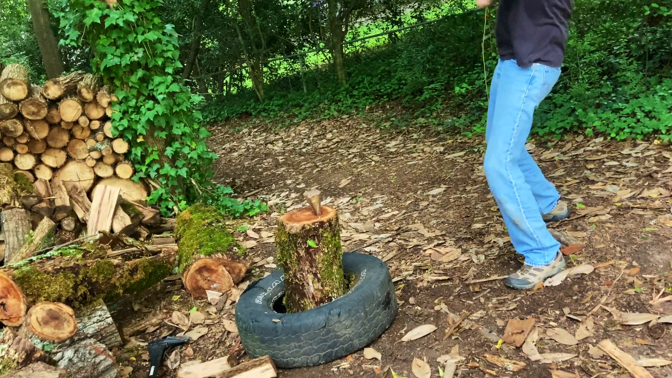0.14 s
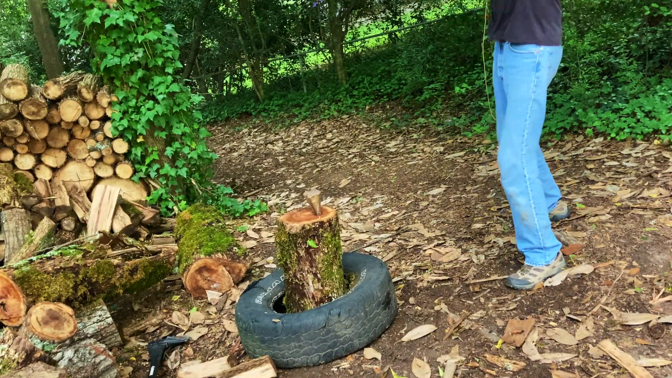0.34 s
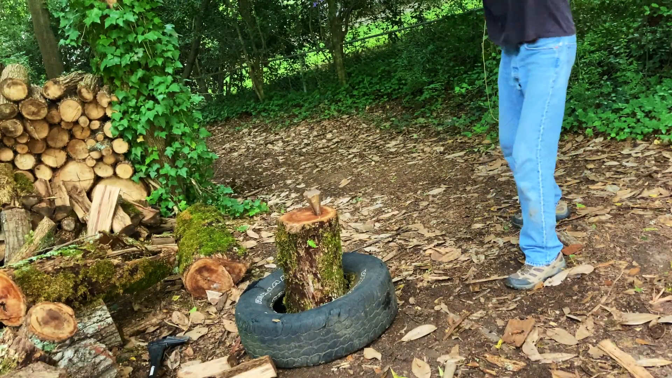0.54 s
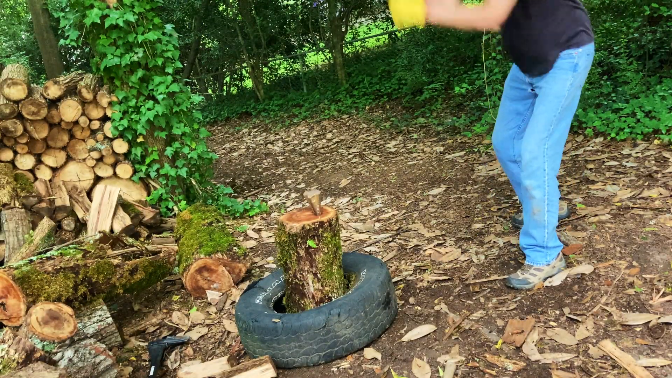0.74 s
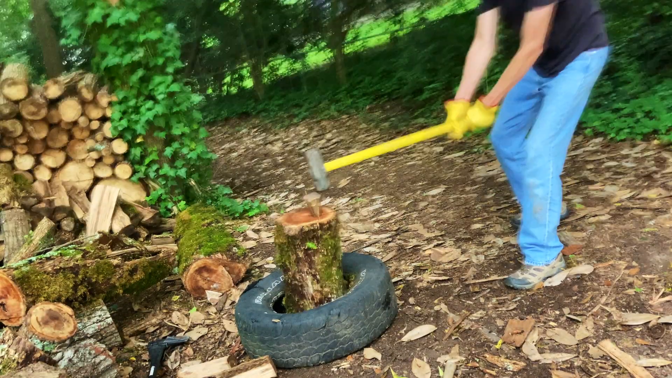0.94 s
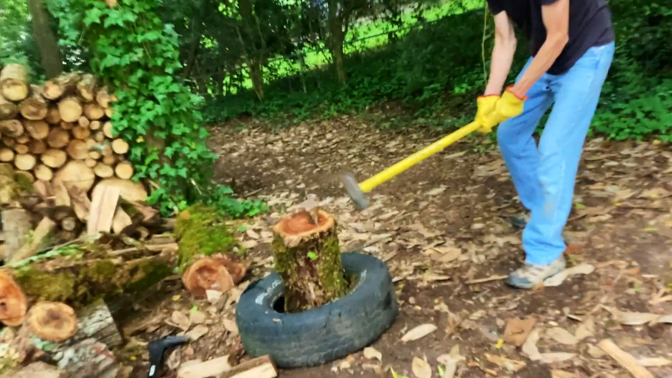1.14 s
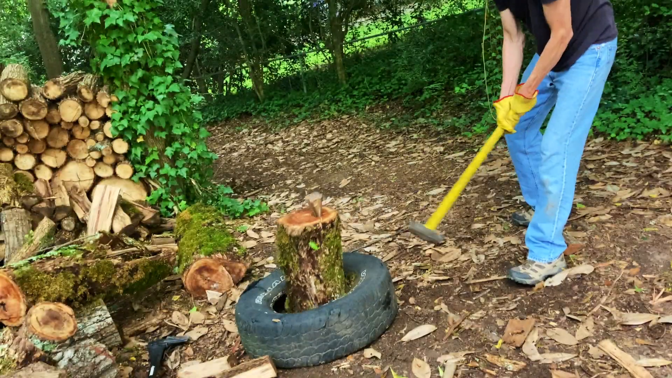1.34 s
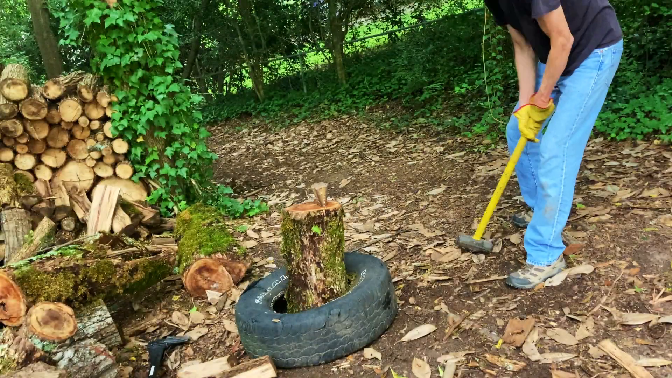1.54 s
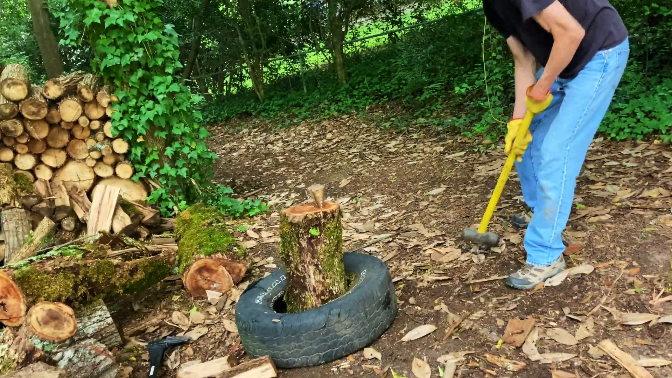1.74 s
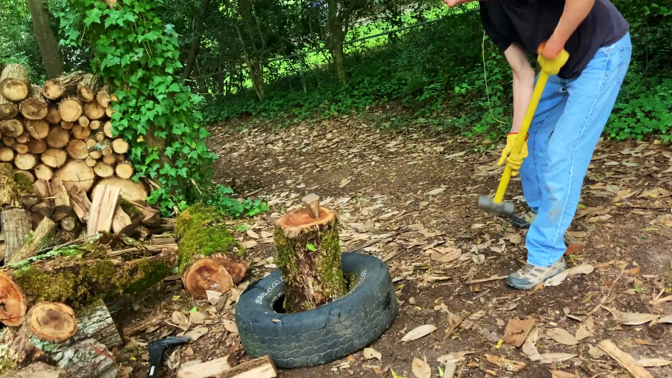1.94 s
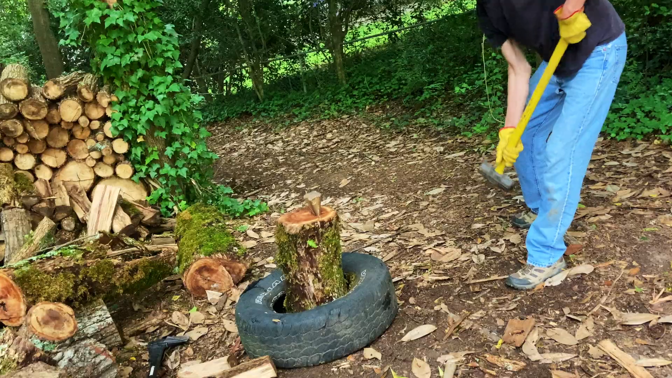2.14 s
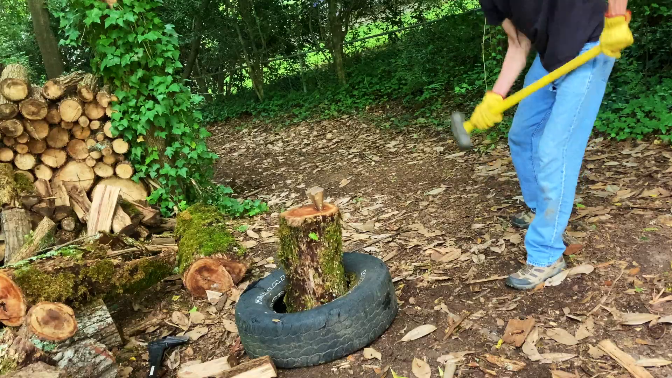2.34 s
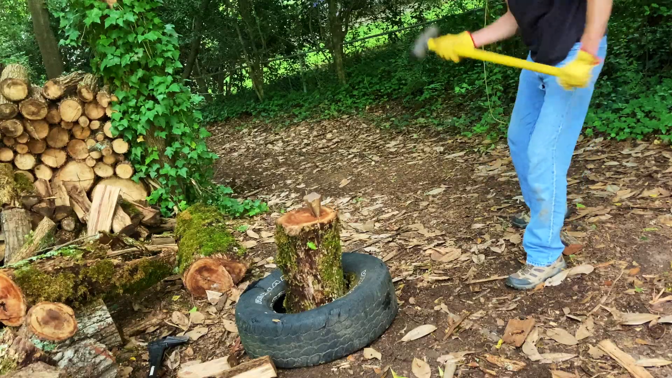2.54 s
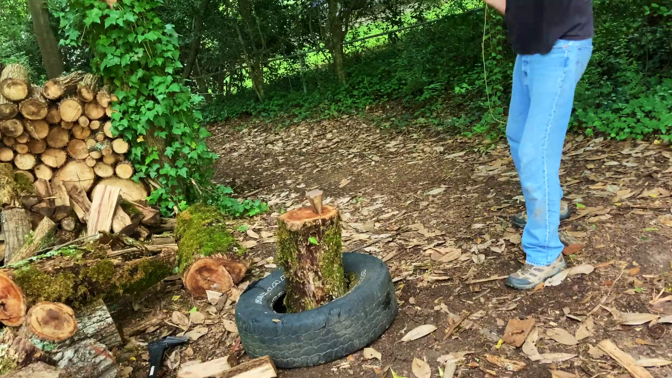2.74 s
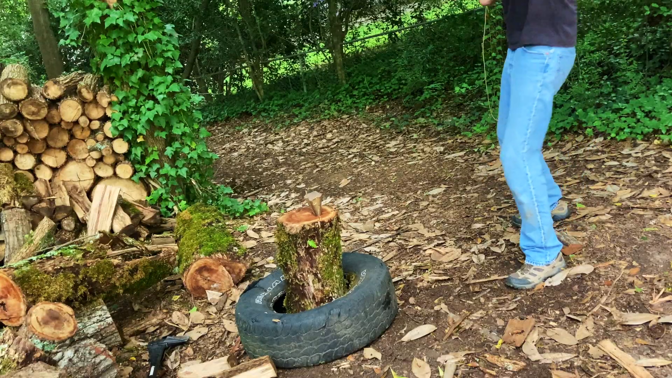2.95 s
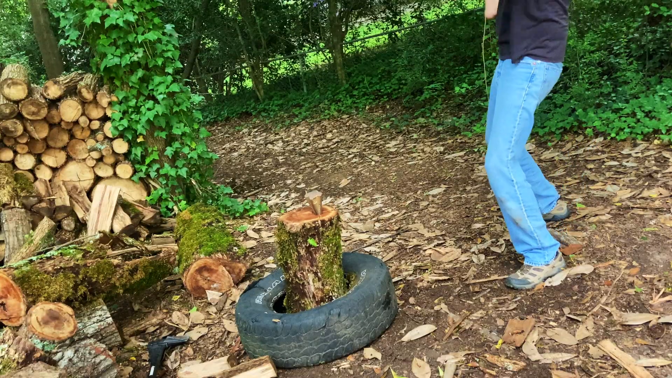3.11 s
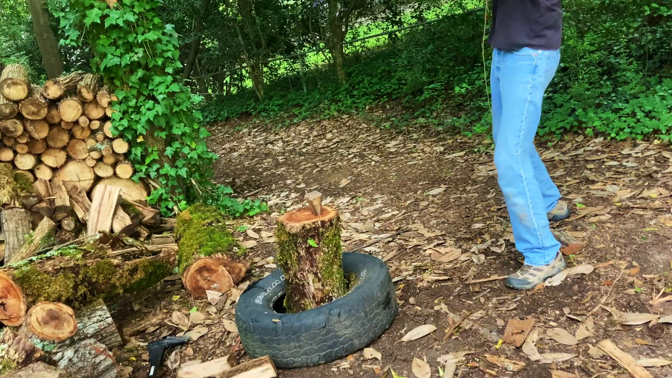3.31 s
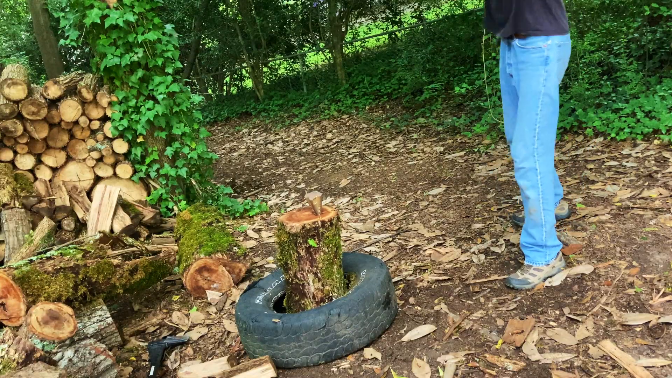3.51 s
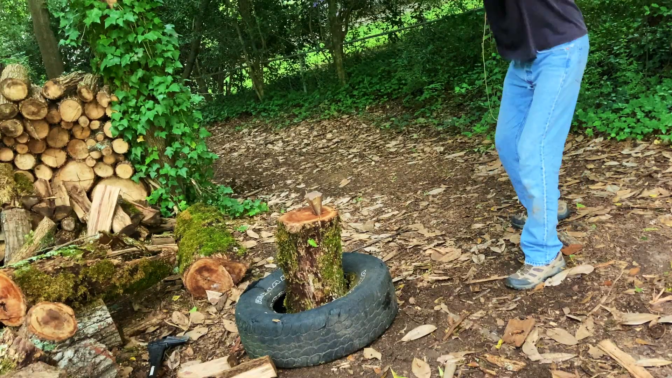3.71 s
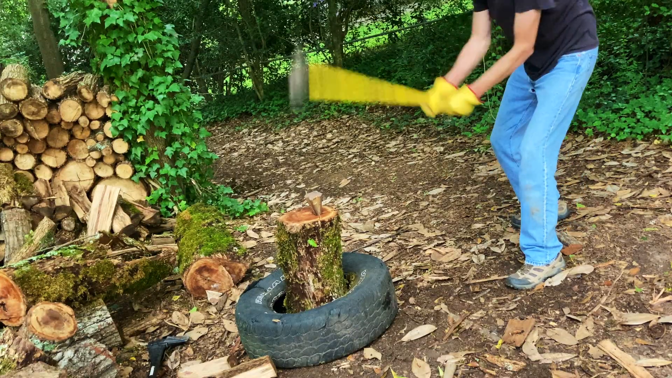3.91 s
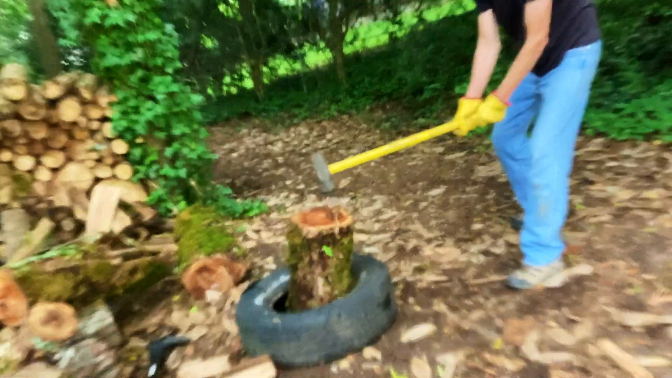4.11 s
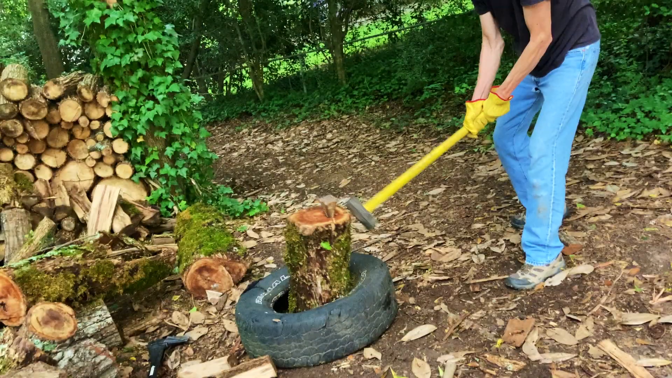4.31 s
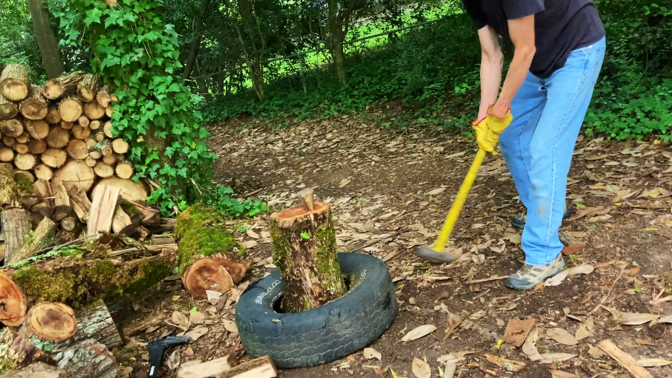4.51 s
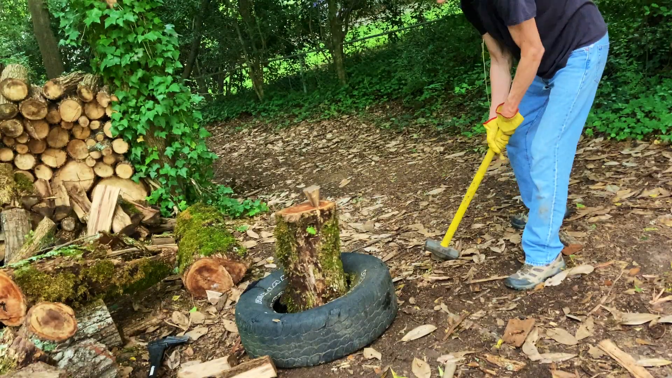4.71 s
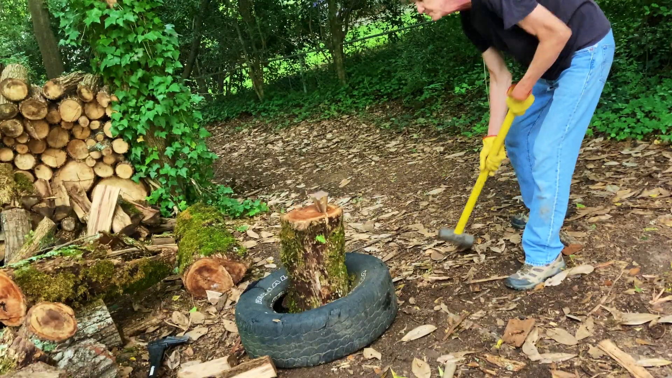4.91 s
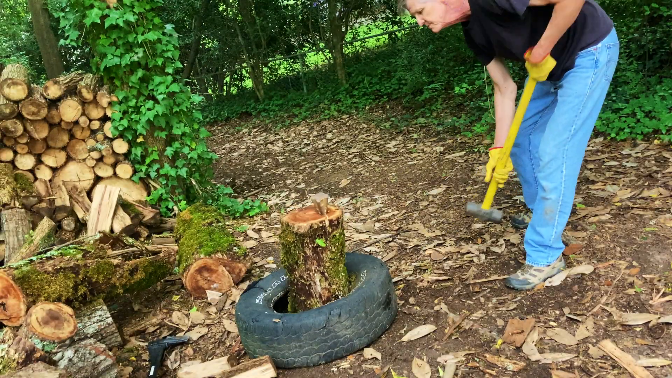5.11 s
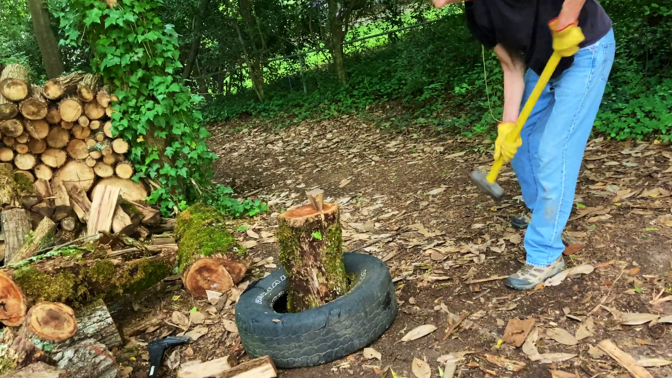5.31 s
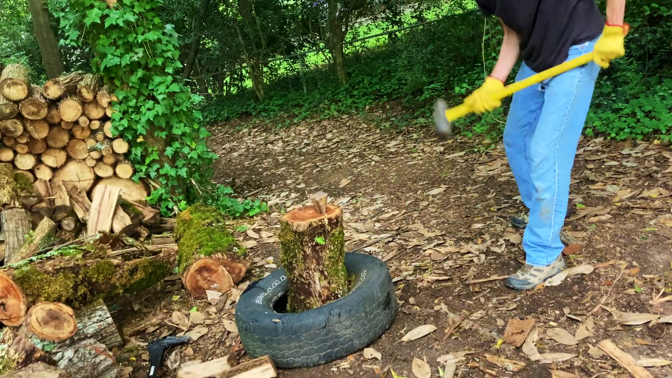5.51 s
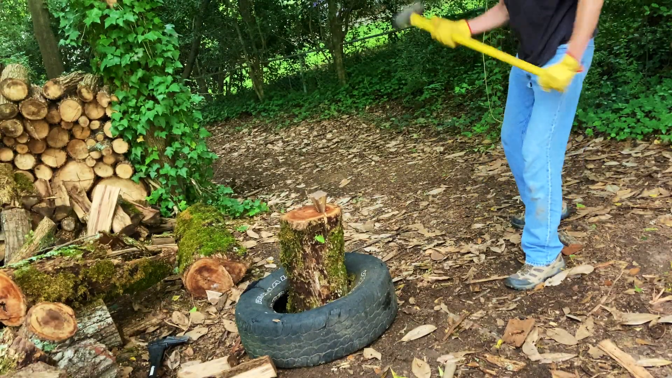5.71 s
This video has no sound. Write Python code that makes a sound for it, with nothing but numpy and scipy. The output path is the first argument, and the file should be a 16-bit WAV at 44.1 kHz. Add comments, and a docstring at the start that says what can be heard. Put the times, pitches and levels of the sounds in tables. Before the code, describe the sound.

A heavy hammer cracks down twice on a metal wedge in wood, three seconds apart, amid dry leaf rustle and faint insect shrill.

```python
"""Hammer and wedge in a wood

A sledgehammer strikes a steel wedge in a log twice: noise bursts for tick, tearing fibres and grit, damped
tones for knock, ping and ground thud, and coloured noise and ringing tones scattered back by the trees.
Gliding resonances of grainy noise are footwork in dry leaves before each swing; the head drops into litter
after it. A faint squeak, a high shrill, air, rumble and a far engine remain; gain control ducks the whole mix.
"""
import sys
import numpy as np
from scipy import signal
from scipy.fft import rfft, irfft
from scipy.io import wavfile
from scipy.ndimage import uniform_filter1d

SR = 44100
rng = np.random.default_rng(int(sys.argv[2]) if len(sys.argv) > 2 else 0)


def digitize_waveform(pressure):
    """Quantize a signal to 16-bit integers and store it at the path in sys.argv[1].

    Rows of a 2-D input are taken as channels; values are limited to [-1, 1].
    """
    field = np.atleast_2d(pressure).T
    bounded = np.clip(field, -1, 1)
    quanta = np.round(bounded * 32767).astype(np.int16)
    wavfile.write(sys.argv[1], SR, quanta)


N = 258405
TIME = np.arange(N) / SR
LEFT_RIGHT = np.array([[1], [-1]])

# hammer blows: start_s, force_db, then relative to force: crack_db, grit_db, near_scatter_db,
# tree_echo_db, far_tree_echo_db, echo_steel_tones_db
BLOWS = [(0.935, 18.5, -15, -21, -29, -40.5, -51, -5), (3.967, 8.5, -14, -19.5, -32, -58, -43, 4)]
# colour of crunching litter and wood: freq_hz, relative_density_db
CRUNCH_COLOUR = [(150, -24), (600, -1), (1400, -0.5), (2550, -1), (3200, -9.5), (4400, -5), (7000, -17),
                 (15000, -47)]
# colour of brushed leaves: freq_hz, relative_density_db
HISS_COLOUR = [(1000, 8), (4000, 0.5), (8500, -5), (11500, -1), (14500, -18.5), (17000, -29.5)]
# breaking leaves: grain spacing, spread of grain level
LEAF_GRAIN_S, LEAF_GRAIN_DB = 0.0025, 3


def hammer():
    """Steel ticks on steel, the driven wedge tears fibres; steel, log and soil ring as damped modes."""
    # wedge and log under the hammer: freq_hz, t60_s, first_blow_db, second_blow_db
    knock_modes = [(174, 0.046, -13.5, -19), (243.7, .04, -14, -16.5), (335.2, 0.046, -25, -22.5),
                   (530, 0.03, -20.5, -11.5), (652, 0.03012, -10.5, -6.5), (786, 0.025, -7, -22),
                   (898, 0.043, -10, -23), (1160, 0.017, -22, -20), (1490, 0.024, -20, -16.5),
                   (1710.6, 0.035, -12.5, -9.5), (2130, 0.03, -21, -23), (2295, 0.059, -16, -27),
                   (2453, .035, -19.5, -15), (2618, 0.03, -15, -37), (2868, 0.03, -28, -9),
                   (3320, 0.017, -15, -27), (4010, .025, -27, -25), (4610, 0.02, -15.5, -7),
                   (7815, 0.05, -15.5, -3.5), (8180, 0.051, -24.5, -33), (8660, 0.042, -32, -21)]
    # steel and log ringing freely: freq_hz, t60_s, first_blow_db, second_blow_db
    ping_modes = [(892.6, 0.05, -39.5, -53.5), (1160, .05, -56, -37.5), (1554, 0.068, -33.5, -48),
                  (1760, 0.05, -32.5, -37), (2147, 0.13, -40.5, -48.5), (2350, .045, -41, -37.5),
                  (2715, 0.066, -35.5, -52), (2927, 0.07, -50, -33.5), (3170, .06, -38.5, -45.5),
                  (3420, 0.079, -39, -34), (4180, .06, -44, -35), (4640, 0.06, -43.5, -33.5),
                  (4800, .06, -41, -46), (5280, .06, -49.5, -37), (6962, 0.055, -48, -22.5),
                  (7790, .07, -42, -15.5), (7850, .12, -32, -20.5), (8200, 0.093, -29.5, -25.5),
                  (11310, 0.05, -35, -34.5), (12700, 0.07, -43, -39.5), (14815, .07, -74, -33)]
    # log bouncing on the soil: freq_hz, t60_s, first_blow_db, second_blow_db
    thud_modes = [(46.3, 0.28, -31.5, -46), (91.9, 0.12, -17, -23), (165, 0.15, -31.5, -35.5)]
    # first steel contact: freq_hz, relative_density_db
    tick_colour = [(300, -28), (900, -15), (1600, -3), (2300, 0.5), (3100, -4), (3800, -10), (4700, -2),
                   (5900, -18), (7800, -7.5), (9500, -24), (16000, -43.5)]
    # tearing fibres: freq_hz, relative_density_db
    crack_colour = [(150, -9), (430, -21), (700, 2.5), (1150, -4.5), (1500, -0.5), (2400, -7), (3800, -15),
                    (4700, -14), (5900, -23.5), (7800, -12.5), (9500, -28), (16000, -47)]
    # high grit: freq_hz, relative_density_db
    grit_colour = [(3000, -25), (6000, -14), (8000, 5), (9600, -12), (11300, 3.5), (12600, -8.5),
                   (14000, -18.5), (16000, -25.5)]
    tick_rel_db, crack_lag_s = -13, 0.0022

    out = np.zeros((2, N))
    t = TIME[:3 * SR // 2]
    for blow, (s, force_db, crack_db, grit_db, near_db, trees_db, far_db, ring_db) in enumerate(BLOWS):
        force = from_db(force_db)
        tick = from_db(tick_rel_db) * burst(tick_colour, t, length_s=0.0022)
        crack = from_db(crack_db) * burst(crack_colour, t, length_s=0.0036)
        grit = from_db(grit_db) * burst(grit_colour, t, length_s=0.0035)
        # low knock modes take longest to build up
        knock = modes(knock_modes, blow, t, rise_s=lambda hz: 0.0002902 + 1.2 / hz,
                      waver_hz=10, released_db=-7)
        ping = modes(ping_modes, blow, t, rise_s=lambda hz: 0.001, waver_hz=32, released_db=2)
        thud = modes(thud_modes, blow, t, rise_s=lambda hz: 0.009, waver_hz=0, released_db=0)
        add(out, s, force * ports(tick + grit + knock + ping + thud))
        add(out, s + crack_lag_s, force * ports(crack))
        ringing = ping + from_db(-19.0) * knock
        add(out, s, force * woods(ringing, t, near_db, trees_db, far_db, ring_db))
    return out


def burst(colour, t, length_s):
    """Dense cracks filling the colour evenly; energy of an rms of 1 over length_s."""
    gate = np.exp(-(t / length_s) ** 4)
    gain = colour_gain(colour, len(t))
    sound = rng.standard_normal(len(t))
    # alternate between the wanted spectrum and the short gate
    for _ in range(3):
        phase = np.angle(rfft(sound * gate))
        sound = gate * irfft(np.exp(1j * phase) * gain, len(t))
    return sound * np.sqrt(length_s * SR / np.sum(sound ** 2))


def modes(table, blow, t, rise_s, waver_hz, released_db):
    """Damped tones; pitch wavers as the wedge shifts, level moves by released_db as the hammer lets go."""
    log_lag_s, log_below_hz = 0.001419, 1900   # the log's low modes answer after the steel
    contact_s = 0.01
    out = 0
    moments_s = np.arange(0, t[-1], 0.003)
    for k, (hz, t60_s, *levels_db) in enumerate(table):
        lag_s = log_lag_s / (1 + (hz / log_below_hz) ** 4)
        since_s = np.maximum(t - lag_s, 0)
        # low modes are released last
        released = np.clip(2 * (t - 2 / hz) / contact_s - 1.5, 0, 1)
        waver = waver_hz * np.interp(t, moments_s, rng.standard_normal(len(moments_s)))
        turns = hz * since_s + np.cumsum(waver) / SR
        level = from_db(levels_db[blow] + released_db * released)
        sign = (-1) ** k   # neighbours in opposite sign
        out = out + sign * level * swell(since_s, rise_s(hz), t60_s) * np.sin(2 * np.pi * turns)
    return out


def ports(sound):
    """Two microphone ports hear a near source with a frequency-dependent phase difference."""
    # phase between the ports: freq_hz, left_lead_rad
    port_phase = [(0, .25), (550, .5), (1000, -.1), (1700, -.7), (2500, -1.4), (4600, -1.35), (7800, -.9),
                  (12000, -1.76), (16000, -2)]
    size = len(sound)
    hz, lead_rad = np.transpose(port_phase)
    turn_rad = np.interp(np.arange(size // 2 + 1) * SR / size, hz, lead_rad) * 0.5 * LEFT_RIGHT
    fade_end = np.minimum(1, np.linspace(8, 0, size) ** 4)
    return irfft(rfft(sound) * np.exp(1j * turn_rad), size) * fade_end


def woods(ringing, t, near_db, trees_db, far_db, ring_db):
    """Ground and woodpile scatter at once, the trunks for longer, the far tree line last."""
    # scatter from the trees: freq_hz, relative_density_db
    tree_colour = [(100, -7.5), (250, -8.5), (450, -10), (900, -4), (1300, -3.5), (1700, 0.5), (2900, -2.5),
                   (3900, -3), (4650, -3), (6000, -7), (8000, -2), (9600, -18), (12000, -16.5),
                   (14000, -45.5)]
    # dull echoes from the edge of the clearing: delay_s, level_db, t60_s
    edge_echoes = [(.035, -43, .04), (.138, -58, 0.037), (.191, -42.5, .067), (0.332, -64, 0.07)]
    # their colour: freq_hz, relative_density_db
    edge_colour = [(250, -29.5), (700, -5), (1100, -12), (1600, -0.5), (2300, -21), (5000, -17),
                   (12000, -50)]
    # air and leaves dulling the returning steel tones: freq_hz, relative_gain_db
    ring_path = [(900, -1), (1700, 2.5), (2900, 5), (3600, 3.5), (4700, 2), (7000, 0), (8200, -2.5),
                 (12500, -4.5), (15000, -12)]
    far_trees_s = 0.07

    near = from_db(near_db) * swell(t, rise_s=0.00085, t60_s=0.33)
    trunks = from_db(trees_db) * swell(t, rise_s=0.007, t60_s=0.56)
    far = from_db(far_db) * swell(np.maximum(t - far_trees_s, 0), rise_s=0.072, t60_s=1.0)
    level = np.sqrt(near ** 2 + trunks ** 2 + far ** 2)
    # single trunks stand out
    level = level * crackle(grain_s=0.004, depth_db=2.6)[:len(t)]
    wash = from_db(1.0) * level * noise(tree_colour, size=len(t))

    edge_level = sum(from_db(db) * swell(np.maximum(t - delay_s, 0), rise_s=0.005, t60_s=t60_s)
                     for delay_s, db, t60_s in edge_echoes)
    edge = edge_level * noise(edge_colour, size=len(t))

    # the steel's tones come back along the same paths
    paths = level * noise(ring_path, size=len(t))
    tones = signal.fftconvolve(ringing[None], paths, axes=1)[:, :len(t)]
    return wash + edge + from_db(ring_db) * tones / np.sqrt(np.sum(ringing ** 2))


def feet():
    """Shoes crunch and brush leaf litter grain by grain; scrape resonances glide as the sole turns."""
    # footwork before a swing (sole twists, foot lifts, brushes forward):
    # offset_s, length_s, crunch_centre_hz, glide_end_to_start_ratio, relative_crunch_db, relative_hiss_db
    footwork = [(0, .08, 1550, 1.4, -52, -66), (0.145, 0.07, 2150, 1.1, -63.5, -64.5),
                (0.19, .09, 1400, 1.2, -68, -65), (0.235, 0.085, 2050, .85, -60.5, -56.5)]
    # wind-ups, each playing that footwork: start_s, crunch_offset_db, hiss_offset_db, crunch_pitch_ratio
    wind_ups = [(0.203, -3.5, 1, .92), (3.237, 2, -1, 1.3)]
    # weight shifts and picking up the hammer:
    # start_s, length_s, crunch_centre_hz, glide_end_to_start_ratio, crunch_db, hiss_db
    scuffs = [(.111, 0.085, 1540, 0.86, -61.5, -77), (2.02, 0.071, 1300, 1.7, -57.5, -62),
              (2.631, 0.11, 1550, 1.6, -57, -66), (3.065, 0.055, 1800, 1.2, -62.5, -70),
              (5.405, 0.34, 1260, 1.2, -60.5, -63), (5.652, 0.21, 1190, 1, -60, -64),
              (5.786, 0.29, 1650, 1.6, -59.5, -58.5)]
    # sole resonances gliding together: ratio_to_centre, relative_db
    scrape_modes = [(.75, 0), (1, 2), (1.25, 1)]
    scrape_width_hz = 140

    steps = [(start_s + s, length_s, ratio * hz, glide, weight_db + crunch_db, brush_db + hiss_db)
             for start_s, weight_db, brush_db, ratio in wind_ups
             for s, length_s, hz, glide, crunch_db, hiss_db in footwork]
    out, brush = np.zeros((2, N)), np.zeros(N)
    litter = noise(CRUNCH_COLOUR) * crackle(LEAF_GRAIN_S, LEAF_GRAIN_DB)
    for s, length_s, hz, glide, crunch_db, hiss_db in steps + list(scuffs):
        weight = press(s, length_s)
        during = (TIME >= s) & (TIME < s + length_s)
        ground = litter[:, during]
        centre_hz = hz * glide ** ((TIME[during] - s) / length_s - 0.5)
        scrape = sum((-1) ** k * from_db(db) * hollow(ground, ratio * centre_hz, scrape_width_hz)
                     for k, (ratio, db) in enumerate(scrape_modes))
        add(out, s, from_db(crunch_db) * weight[during] * (2.03 * scrape + 0.61 * ground))
        brush += from_db(hiss_db) * weight
    return out + brush * crackle(LEAF_GRAIN_S, LEAF_GRAIN_DB) * noise(HISS_COLOUR)


def press(s, length_s):
    """Leaves are crushed quickly and settle slowly."""
    return np.sin(np.pi * np.clip((TIME - s) / length_s, 0, 1) ** 0.61)


def landings():
    """The hammer head touches down edge first, crushes dry leaves and thumps the soil."""
    # contacts: start_s, knock_db, leaf_crack_db, t60_s, thump_db
    contacts = [(1.446, -30, -36, 0.011, -52), (1.4514, -30.5, -27.5, 0.021, -42),
                (1.4576, -48, -40, 0.12, -49), (4.51, -38, -42, 0.031, -51),
                (4.5206, -41, -37.5, 0.14, -36)]
    # crushed leaves: freq_hz, relative_density_db
    leaf_colour = [(1000, -9), (3200, -27), (4300, 1.5), (6000, -11), (8400, 14.5), (9700, -4),
                   (11400, 6.5), (14000, -13), (16000, -14)]
    # soil thump: freq_hz, relative_density_db
    soil_colour = [(40, -6), (90, 4), (250, -9), (600, -12), (1500, -38), (5000, -70)]
    knock = sum(from_db(db) * snap(s, t60_s) for s, db, _, t60_s, _ in contacts)
    leaves = sum(from_db(db) * snap(s, t60_s) for s, _, db, t60_s, _ in contacts)
    thump = sum(from_db(db) * swell(np.maximum(TIME - s, 0), rise_s=0.0016, t60_s=0.086)
                for s, *_, db in contacts)
    grains = crackle(LEAF_GRAIN_S, LEAF_GRAIN_DB)
    crushed = grains * (knock * noise(CRUNCH_COLOUR) + leaves * noise(leaf_colour))
    return crushed + thump * noise(soil_colour)


def leaf_litter():
    """Twigs, chips and leaves snap at their own pitches; leaves and crumbs keep stirring after each blow."""
    # snaps and taps: start_s, pitch_hz, relative_knock_db, bright_tick_db, t60_s
    twigs = [(0.137, 1500, -51.5, -69, 0.038), (0.193, 1900, -47.5, -55, 0.056),
             (0.49, 1370, -38.5, -62, 0.08), (1.802, 1400, -53, -53, 0.12), (2.018, 840, -38, -56, 0.055),
             (2.071, 950, -44, -70, .025), (3.143, 1800, -44, -78, .015), (3.175, 1600, -36, -78, 0.016),
             (3.2, 1670, -39.5, -78, 0.024), (3.494, 2340, -48, -49.5, 0.13), (3.569, 1500, -53, -75, 0.11),
             (3.738, 1500, -51, -77, 0.056), (4.362, 1160, -29.5, -62, 0.016),
             (4.366, 420, -28.5, -75, 0.048), (4.371, 1150, -45, -70, 0.036)]
    settle_db, settle_rise_s, settle_t60_s = -50.5, 0.05, 3.9
    wood = noise(CRUNCH_COLOUR)
    knock = sum(from_db(db) * snap(s, t60_s) * 1.1 * hollow(wood, hz, width_hz=0.5 * hz)
                for s, hz, db, _, t60_s in twigs)
    bright = sum(from_db(db) * snap(s, t60_s) for s, _, _, db, t60_s in twigs)
    settling = sum(swell(np.maximum(TIME - s, 0), settle_rise_s, settle_t60_s) for s, *_ in BLOWS)
    settling = from_db(settle_db) * settling * crackle(grain_s=0.005, depth_db=3)
    return knock + np.hypot(bright, settling) * noise(HISS_COLOUR)


def snap(s, t60_s):
    """The envelope of something dry breaking at time s."""
    return swell(np.maximum(TIME - s, 0), rise_s=0.00081, t60_s=t60_s)


def squeak():
    """A faint chirp: a cluster of short, slightly rough gliding tones."""
    # tones: start_s, length_s, start_hz, end_hz, level_db
    chirps = [(5.259, 0.022, 2250, 2080, -62), (5.271, 0.027, 1130, 1500, -56),
              (5.286, 0.022, 1800, 1950, -64), (5.281, 0.069, 760, 730, -62)]
    out = 0
    for s, length_s, from_hz, to_hz, db in chirps:
        glide_hz = np.interp(TIME, [s, s + length_s], [from_hz, to_hz])
        rough_hz = glide_hz * crackle(grain_s=0.001, depth_db=0.7)
        out = out + from_db(db) * press(s, length_s) * np.sin(2 * np.pi * np.cumsum(rough_hz) / SR)
    return out


def surroundings():
    """Steady coloured noises for insect-like shrill, rumble and moving air, plus the far engine."""
    # narrow high shrill: freq_hz, relative_density_db
    shrill_colour = [(4000, -64.5), (5500, -43.5), (6500, -30.5), (7000, -9), (7300, -4), (7620, 4.5),
                     (7900, -4), (8300, -10.5), (8900, -23), (9600, -58), (11000, -70.5)]
    # low rumble: freq_hz, relative_density_db
    rumble_colour = [(18, -38), (35, -11), (55, 0.5), (78, 1.5), (120, -4), (170, -13.5), (260, -19.5),
                     (400, -24.5), (700, -35), (1500, -60.5), (5000, -89.5)]
    # moving air: freq_hz, relative_density_db
    air_colour = [(200, -7), (550, 1), (900, -4), (1500, -12.5), (2800, -16.5), (4200, -12.5),
                  (5600, -17.5), (8500, -22), (10500, -43.5), (16000, -61)]
    shrill = from_db(-47) * noise(shrill_colour)
    low = from_db(-46.5) * noise(rumble_colour) + engine()
    air = from_db(-60) * noise(air_colour)
    balance = from_db(0.29 * LEFT_RIGHT)   # slightly to the left
    return (low + shrill + air) * balance


def engine():
    """A far hum of harmonics on a slowly wandering pitch; each tone fades in and out on its own."""
    # harmonics, lowest first: relative_db
    harmonics_db = [-2, -1, -5.5, -16.5, -15.5, -19]
    # near the end the overtones dip and the lowest tone swells: time_s, lowest_tone_db, overtones_db
    drone = [(0, 4, 3.5), (2, 2.5, -0.5), (4.8, -1.5, -1), (5.3, 11.5, -12), (5.86, 14, -0.5)]
    pitch_hz, level_db = 97.8, -55.5
    wander_rms_hz, wander_step_s = 0.5, 3.6
    lowest_db, overtones_db = in_time(drone)
    wander = np.interp(TIME / wander_step_s, np.arange(20), rng.standard_normal(size=20))
    turns = np.cumsum(pitch_hz + wander_rms_hz * wander) / SR
    out = 0
    for k, db in enumerate(harmonics_db):
        level = from_db(level_db + db + (overtones_db if k else lowest_db))
        tone = np.sin(2 * np.pi * (k + 1) * turns)
        out = out + level * tone * crackle(grain_s=0.21, depth_db=1.5)
    return out


def from_db(db):
    """Decibels to gain."""
    return 10 ** (np.asarray(db) / 20)


def in_time(rows):
    """Each column of a curve at every sample."""
    s, *columns = np.transpose(rows)
    return [np.interp(TIME, s, column) for column in columns]


def add(out, s, sound):
    """Mix a sound in from time s."""
    at = int(round(s * SR))
    out[:, at:at + sound.shape[-1]] += sound[..., :N - at]


def colour_gain(colour, size):
    """A colour as gain on the frequency grid of size samples."""
    hz, db = np.transpose(colour)
    grid_hz = np.arange(size // 2 + 1) * SR / size
    return from_db(np.interp(np.log(grid_hz + 1), np.log(hz), db))


def noise(colour, size=N):
    """Coloured stereo noise, alike in the bass and wide above; rms 1."""
    # sound arriving from all around: freq_hz, side_minus_mid_db
    stereo_width = [(60, -17.5), (200, -11), (380, -2), (700, 1), (1300, 2), (4400, 1.5), (8000, -4.5),
                    (12000, -0.5)]
    mid, side = rfft(rng.standard_normal((2, size))) * colour_gain(colour, size)
    both = irfft(mid + colour_gain(stereo_width, size) * side * LEFT_RIGHT, size)
    return both / both.std()


def crackle(grain_s, depth_db):
    """A random gain moving to a new value every grain_s; rms 1 over the whole scene."""
    moments_s = np.arange(0, TIME[-1], grain_s)
    gain = from_db(depth_db * np.interp(TIME, moments_s, rng.standard_normal(len(moments_s))))
    return gain / np.sqrt(np.mean(gain ** 2))


def swell(t, rise_s, t60_s):
    """An envelope that builds up, then dies away."""
    return (1 - np.exp(-(t / rise_s) ** 2)) * from_db(-60 * t / t60_s)


def hollow(sound, hz, width_hz):
    """A resonance whose centre may move: shift it to 0 Hz, low-pass, shift back."""
    turn = np.exp(2j * np.pi * np.cumsum(hz * np.ones(sound.shape[-1])) / SR)
    keep = np.exp(-np.pi * width_hz / SR)
    return 2 * np.real(turn * signal.lfilter([1 - keep], [1, -keep], sound * turn.conj()))


def scene():
    """The sum of all sources."""
    return hammer() + feet() + landings() + leaf_litter() + squeak() + surroundings()


def release(cut_db, db_per_s):
    """Follow a cut up at once and let it go at a steady rate."""
    return np.maximum.accumulate(cut_db + db_per_s * TIME) - db_per_s * TIME


def gain_control(sound):
    """Loud sound turns the gain down just ahead of itself; part returns quickly, the held share slowly."""
    limit_db, held_share = -10.5, 0.73
    quick_db_per_s, slow_db_per_s = 9.5, 1
    detector_s, look_ahead_s = 0.008, 0.005
    power = uniform_filter1d(np.mean(sound ** 2, axis=0), size=int(detector_s * SR))
    over_db = np.maximum(10 * np.log10(np.maximum(power, 1e-12)) - limit_db, 0)
    quick_db = release(over_db, quick_db_per_s)
    slow_db = release(held_share * over_db, slow_db_per_s)
    cut_db = np.maximum(quick_db, slow_db)
    return sound * from_db(-np.interp(TIME + look_ahead_s, TIME, cut_db))


def record(dry):
    """Gain control; then the highest peaks are rounded and the top is cut."""
    ceiling, stopband_hz = 1.1, 16800
    rounded = ceiling * np.tanh(gain_control(dry) / ceiling)
    top_cut = signal.cheby2(14, 70, stopband_hz, fs=SR, output="sos")
    return signal.sosfilt(top_cut, rounded)


dry = scene()
out = record(dry)
digitize_waveform(out)
```